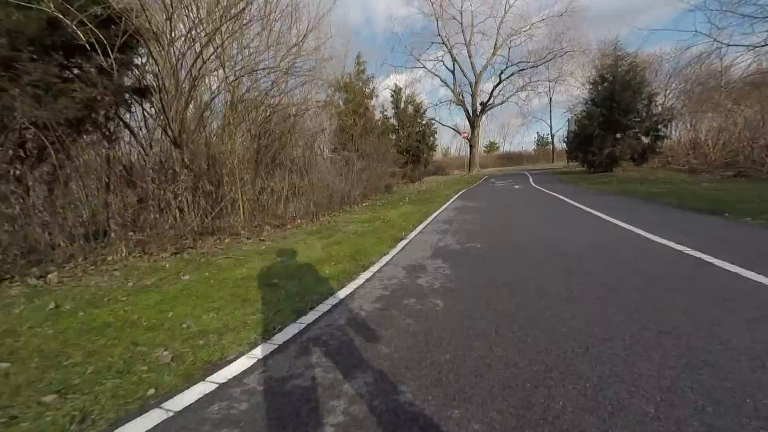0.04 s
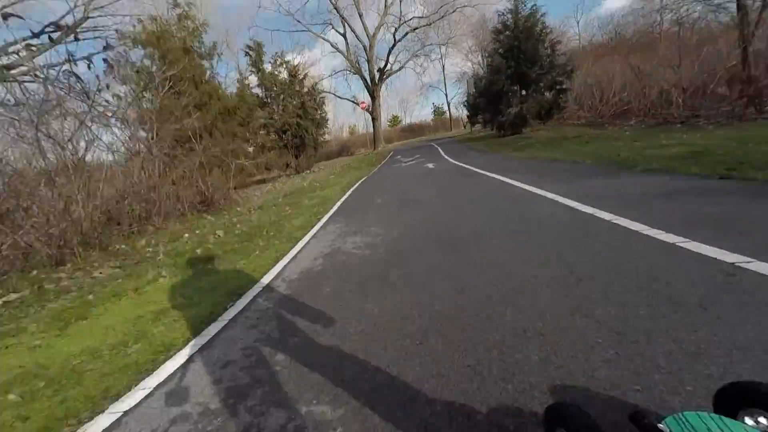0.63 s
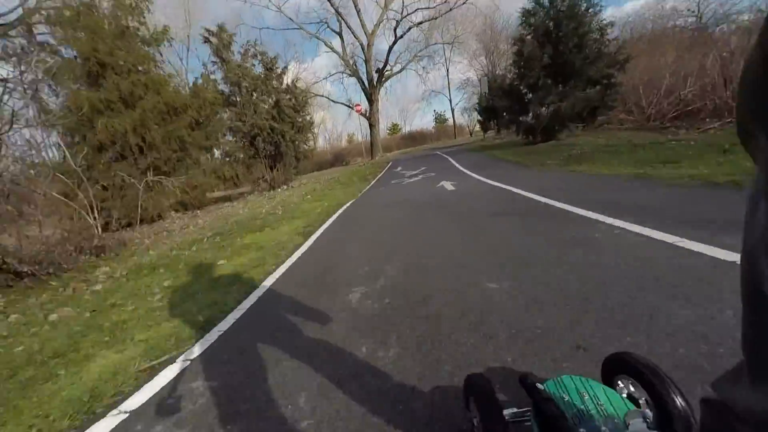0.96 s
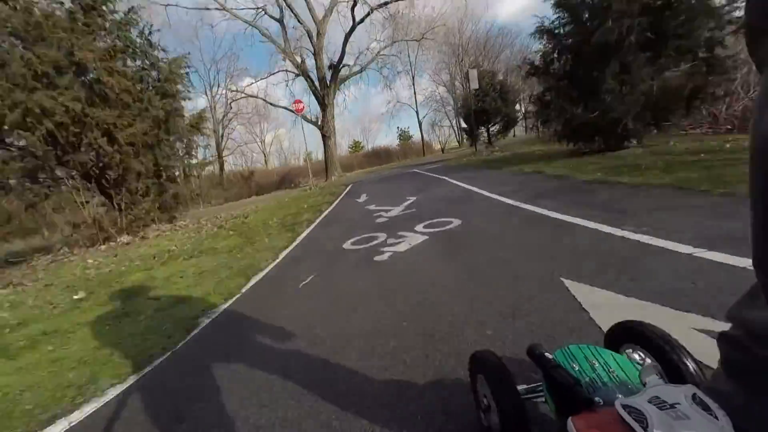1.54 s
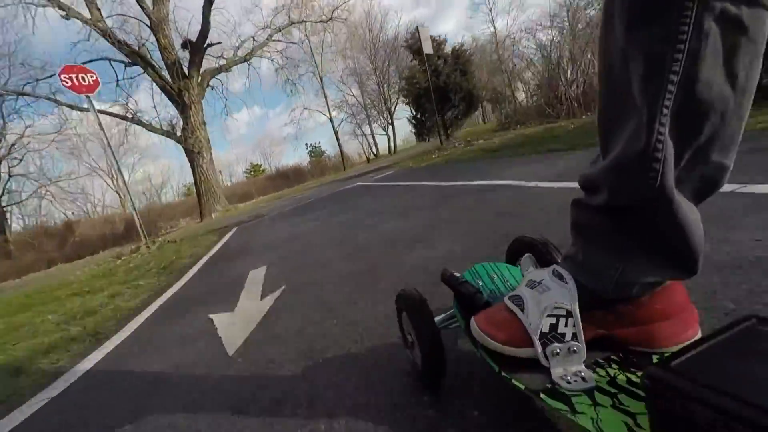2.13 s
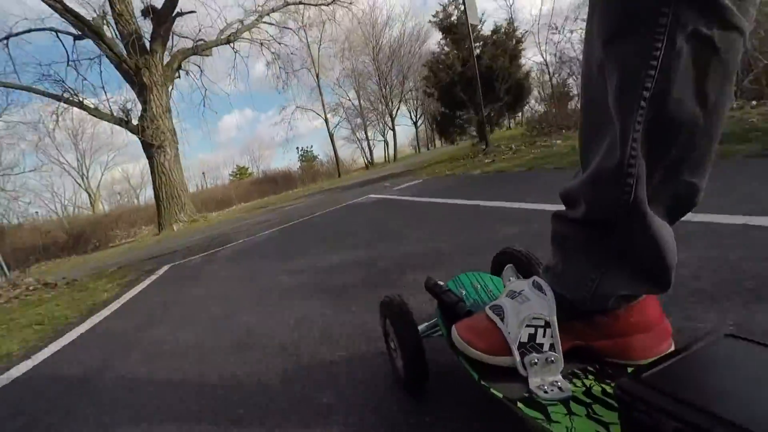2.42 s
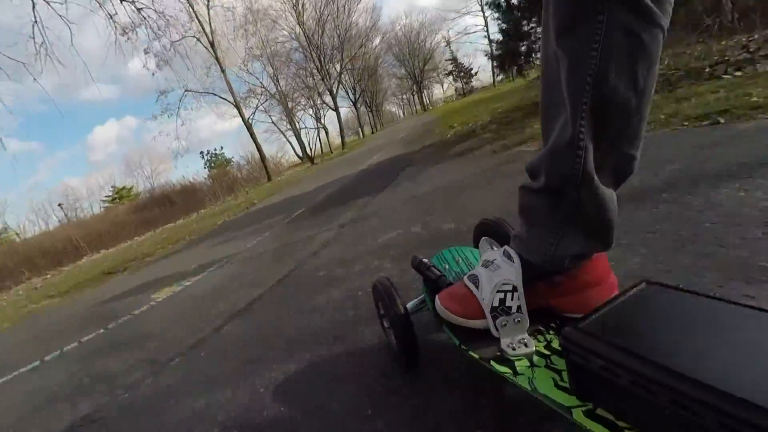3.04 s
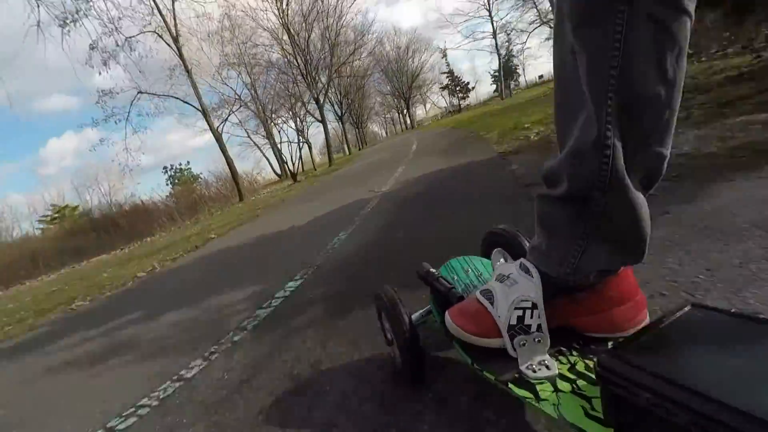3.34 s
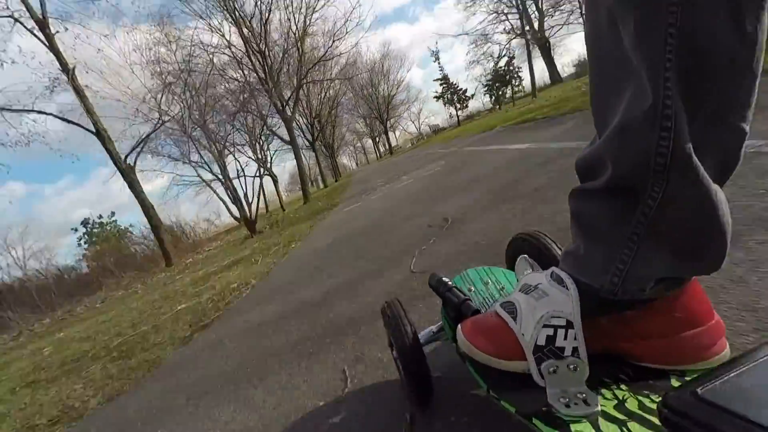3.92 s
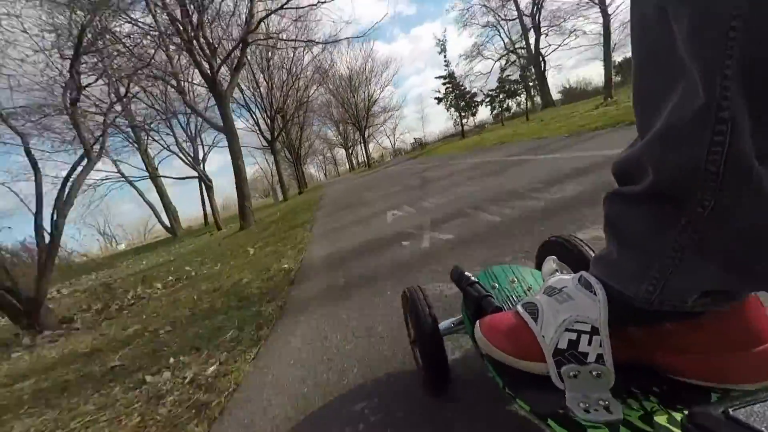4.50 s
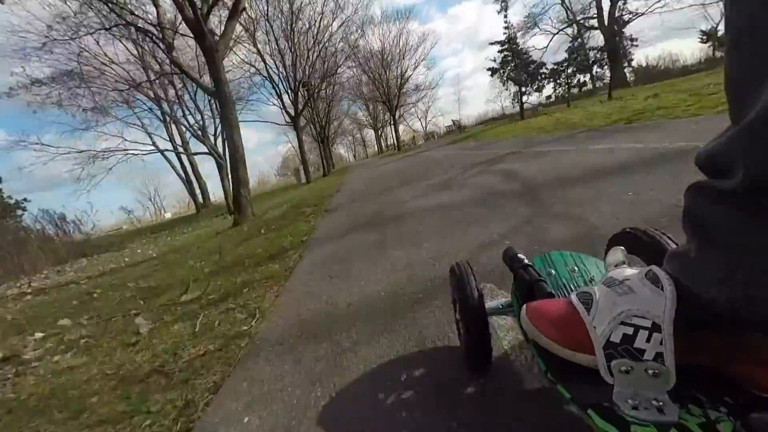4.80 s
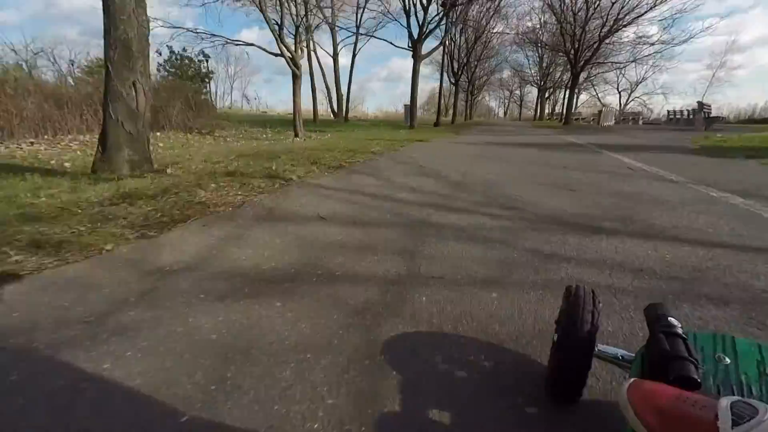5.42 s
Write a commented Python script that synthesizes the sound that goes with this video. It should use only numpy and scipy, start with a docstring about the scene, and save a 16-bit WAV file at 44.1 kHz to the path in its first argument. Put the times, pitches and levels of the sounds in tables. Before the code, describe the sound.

Wind buffets over tyre hiss as an electric board whines, coasts briefly, then drives on, with one sharp stone tick.

```python
"""An asphalt path, heard from just above the deck of a rolling electric mountain board.
The rider drives, coasts for about a second and drives on through a bend. Under power the switched
motor current whistles, the transmission's teeth rasp through the mounts and the shafts hum.
The tyres hiss and flick grit against the board, and wind buffets the microphone."""
import sys
import numpy as np
from scipy import signal
from scipy.fft import rfft, irfft, next_fast_len
from scipy.io import wavfile

SR = 44100
rng = np.random.default_rng(int(sys.argv[2]) if len(sys.argv) > 2 else 0)


def store_pcm(level_fs):
    """Save levels as 16-bit WAV."""
    pcm = np.round(np.clip(level_fs, -1, 1) * 32767).astype(np.int16)
    wavfile.write(sys.argv[1], SR, np.atleast_2d(pcm).T)


N = 245195
TIME = np.arange(N) / SR
SWITCHING_HZ, CRUISE_HZ = 7616, 110  # the controller's switching rate; electrical speed at a cruise


def amp(db):
    """Decibels to gain."""
    return 10 ** (np.asarray(db) / 20)


def unit(x):
    """Scales to rms 1."""
    return x / np.sqrt(np.mean(abs(x) ** 2) + 1e-20)


def curves(rows):
    """Automation lanes: each column of a time table, one value a sample."""
    times, *columns = np.transpose(rows)
    return [np.interp(TIME, times, column) for column in columns]


def swell(s, half_s):
    """A smooth bump of height 1 around the time s."""
    return np.exp(-((TIME - s) / half_s) ** 2)


def colour(x, points):
    """EQ along a (Hz, dB) outline, falling 60 dB an octave beyond its ends; rms 1."""
    hz, db = np.transpose(points)
    size = next_fast_len(N)
    octave, outline = np.log2(np.fft.rfftfreq(size, 1 / SR) + 1), np.log2(hz)
    beyond = abs(octave - np.clip(octave, outline.min(), outline.max()))
    gain = amp(np.interp(octave, outline, db) - 60 * beyond)
    return unit(irfft(rfft(x, size) * gain, size)[:N])


def drift(rate_hz):
    """A smooth, complex random modulator of rms 1, about rate_hz wide."""
    control_s = np.arange(2 ** 14) / 2500
    hz = np.fft.fftfreq(len(control_s), control_s[1])
    noise = rng.standard_normal((len(control_s), 2)) @ [1, 1j]
    smooth = np.fft.ifft(np.fft.fft(noise) / (1 + (hz / rate_hz) ** 2))
    return unit(np.interp(TIME, control_s, smooth))


def noise_band(hz, width_hz):
    """Narrow noise around one pitch."""
    return (drift(width_hz) * np.exp(2j * np.pi * hz * TIME)).real


def grains(per_s, spread_db):
    """Random tiny impacts, most small and a few large."""
    size = amp(spread_db * np.minimum(rng.exponential(1, N), 4))
    return unit(size * rng.choice([-1, 1], N) * (rng.random(N) < per_s / SR))


def wind():
    """Slow eddies thump the microphone; stronger gusts break up into quicker flutter."""
    # airflow, easing as the board slows and turns: (time [s], buffet level [dB])
    airflow = [(.1, -25), (1.7, -24), (2.2, -28.5), (3, -29.5), (3.35, -35.5), (3.8, -38), (4.55, -31.5),
               (5.55, -36)]
    # single gusts: (time [s], buffet boost [dB], flutter boost [dB])
    gusts = [(.17, 5, -3), (.57, 11, 3), (1.24, 4.5, 2.5), (1.46, 6, 3), (1.659, 10, 4.5), (2.02, 6.5, 2.5),
             (2.3, 6, 2.5), (2.5, 5.5, 1.5), (3.65, 7, 2.5), (4.41, 5, -5), (4.6, 4.5, -2.5),
             (4.92, 11.5, -2), (5.48, 4, 3)]
    # tone of each layer: (frequency [Hz], level [dB])
    buffet_eq = [(8, -17), (18, 0), (28, 0), (45, 0), (62, -4), (85, -40), (200, -34.5)]
    flutter_eq = [(35, -8), (58, 1.5), (80, 1.5), (120, -6.5), (170, -12), (250, -24.5), (400, -42),
                  (900, -39.5), (2000, -54)]
    gust_half_s = .0502
    air_db = curves(airflow)[0]
    buffet_db = air_db + sum(db * swell(s, gust_half_s) for s, db, _ in gusts)
    flutter_db = -26 + 1.792 * (air_db + 25)  # grows faster than the buffet
    flutter_db += sum(db * swell(s, gust_half_s) for s, _, db in gusts)
    buffet = amp(buffet_db) * colour(rng.standard_normal(N), buffet_eq)
    flutter = amp(flutter_db + 3.38 * drift(30.5).real) * colour(rng.standard_normal(N), flutter_eq)
    return buffet + flutter


def tyres():
    """The tread patters on asphalt; coarse patches swell the whole band and sand crackles."""
    # tone of the roar and of the top hiss: (frequency [Hz], level [dB])
    roar_eq = [(120, 2.5), (200, 3.5), (300, 2), (450, -4), (700, -12.5), (1080, -6), (1350, 4.5),
               (1950, -2), (2350, 1), (3100, 6), (3450, 3.5), (3950, 5.5), (4400, -6), (5400, -12.5)]
    hiss_eq = [(5000, -26), (5600, -11), (6700, -6.5), (7400, -20), (7900, -13), (8450, -10), (9300, -20),
               (10200, -10.5), (11500, -24), (12800, -15.5), (15300, -23.5)]
    # coarse or sandy stretches: (middle [s], half length [s], overall boost [dB], extra on hiss [dB])
    patches = [(.12, 0.11, 1.55, -7.5), (0.901, .1, 1.23, 2.5), (1.805, 0.082, 2.5, 0.5),
               (1.961, 0.0615, 0, 4.5), (5.132, 0.178, 2, -2.5), (5.472, 0.032, 2, -5)]
    coarse_db = sum(db * swell(s, half_s) for s, half_s, db, _ in patches)
    sandy_db = sum(db * swell(s, half_s) for s, half_s, _, db in patches)
    roar_db = -38 + coarse_db + 2.225 * drift(51.7).real
    hiss_db = roar_db - 12.94 + sandy_db
    patter = unit(rng.standard_normal(N) + .529 * grains(per_s=900, spread_db=1.58))
    roar = amp(roar_db) * colour(patter, roar_eq)
    hiss = amp(hiss_db + 2 * drift(28.5).real) * colour(patter, hiss_eq)
    t = np.arange(SR // 50) / SR
    burst = rng.standard_normal(len(t)) * np.exp(-t / .0037)
    crackle = signal.oaconvolve(grains(per_s=45, spread_db=3), burst)[:N]
    return roar + hiss + amp(hiss_db - 6) * colour(crackle, hiss_eq)


def grit():
    """Small stones strike the board; each tick rings for a few milliseconds."""
    # stone hits: (time [s], relative peak [dB], brightness centre [Hz])
    hits = [(.8272, -20.5, 3760), (1.5243, -20, 4600), (1.9774, -18, 3820), (2.216, -16.5, 3880),
            (2.4354, -18.5, 3210), (3.0964, -17, 3000), (3.2553, -18, 3000), (3.4879, 0, 3660),
            (3.9147, -15.5, 3820)]
    # the board's modes: (frequency [Hz], level [dB], t60 [s])
    modes = [(1400, -4, .005), (1760, -6, .005), (2300, -4, .003), (3050, 0, .0045), (3880, -3, .008),
             (5300, -24, .004), (6500, -20, .006), (8400, -16, .006), (10200, -14, .005)]
    t, out = np.arange(SR // 30) / SR, np.zeros(N)
    for s, db, centre_hz in hits:
        tick = np.zeros(len(t))
        for k, (hz, mode_db, t60) in enumerate(modes):
            contact_db = -8 * np.log2(hz / centre_hz) ** 2  # a harder contact favours higher modes
            decay = amp(mode_db + contact_db - 60 * t / t60)
            tick += (-1) ** k * decay * np.sin(2 * np.pi * hz * t)  # neighbours swing in opposition
        tick *= np.minimum(t / .0002, 1)
        slot = out[round(s * SR):][:len(t)]
        slot += (amp(db - 1.5) * tick / abs(tick).max())[:len(slot)]
    return out


def motor_tones(partials, turns):
    """Tones locked to the turning motor, each a steady core in a blurred skirt."""
    return unit(sum(amp(db) * ((.7 + drift(blur_hz)) * np.exp(2j * np.pi * order * turns)).real
                    for order, db, blur_hz in partials))


def shaft_hum(turns, load_db, excess_hz):
    """The shafts hum louder under load and at lower speed."""
    # shaft tones: (order [x electrical speed], level [dB], blur [Hz])
    shaft = [(3.25, -8.5, 7), (5, -17, 6), (6.5, -15, 24), (9.75, -11.5, 22), (13, 0, 36)]
    return amp(-41.5 + 1.063 * load_db - .18 * excess_hz) * motor_tones(shaft, turns)


def motor_fizz(ripple, load_db, excess_hz):
    """Bright noise pulsing with the torque ripple; a faster motor fizzes more."""
    # tone of the fizz: (frequency [Hz], level [dB])
    fizz_eq = [(4750, -19), (5280, 7), (5530, -12.5), (5850, 4), (6650, 8), (7000, 7), (7500, -14),
               (8100, -6.5), (8550, -0.5), (9200, -12), (10200, -3), (11400, -13), (12600, -5),
               (15300, -13)]
    level_db = -41 + .376 * load_db + .0219 * excess_hz
    return amp(level_db) * colour(rng.standard_normal(N) * ripple, fizz_eq)


def mounts(x):
    """Rings the motor mounts and truck: each mode is a band-pass applied twice."""
    # resonances: (frequency [Hz], nominal width [Hz], level [dB])
    modes = [(1400, 200, -14), (1790, 130, -18.5), (2400, 450, -19), (3110, 280, -12), (3650, 120, -7),
             (3840, 200, 0), (4010, 170, -1), (5300, 280, -24)]
    out = np.zeros(N)
    for k, (hz, width_hz, db) in enumerate(modes):
        b, a = signal.iirpeak(hz, hz / (1.3 * width_hz), fs=SR)
        out += (-1) ** k * amp(db) * signal.lfilter(b, a, signal.lfilter(b, a, x))
    return unit(out)


def transmission(outer_turns, inner_turns, ripple, load_db, excess_hz):
    """Teeth rattle the mounts: clear tones under load, blurring into a rasp at higher speed."""
    # tooth tones: (order [x electrical speed], level [dB], blur [Hz])
    teeth = [(13, -1, 20), (28, 0, 34), (29, -1, 40), (33, -5, 25), (35, 0, 28), (37, 0, 28)]
    scrape = unit(rng.standard_normal(N) + .174 * grains(per_s=1300, spread_db=1.93)) * ripple
    ring = mounts(motor_tones(teeth, inner_turns))
    bite = amp(-.5 + .25 * load_db - .1 * excess_hz)  # balance of ring to scrape
    rasp = amp(-31.5 + load_db) * (mounts(scrape) + bite * ring) / np.hypot(1, bite)
    # the outer wheel's teeth sing one tone of their own
    mesh = amp(-44 + .097 * load_db) * motor_tones([(28.15, 0, 22)], outer_turns)
    # a brief growl near the mounts' lowest resonance
    growl = amp(-40) * swell(.48, half_s=.01) * noise_band(1410, width_hz=77.5)
    return rasp + mesh + growl


def sidebands(turns, low7_db, low5_db, near_db, high7_db):
    """One motor's switched current sings either side of the switching rate, spaced by its speed."""
    # (order [x electrical speed], level [dB], roughness [0-1])
    tones = [(-7, low7_db, .4), (-5, low5_db + 1, .3), (-2, near_db - 2, .4),
             (2, near_db - 5, .4), (5, high7_db - 15, .6), (7, high7_db - 2, .75)]
    out = np.zeros(N)
    for order, db, roughness in tones:
        waver = 1 + .17 * drift(9) + roughness * drift(75)
        cycles = SWITCHING_HZ * TIME + order * turns
        out += amp(db) * np.sqrt(2) * (waver * np.exp(2j * np.pi * cycles)).real
    return out


def controller_whistle(outer_turns, inner_turns, strain_db, excess_hz):
    """The controller makes both motors whistle, the inner one more softly."""
    # the two main tones: (time [s], shared level [dB], lean from the -7 to the -5 sideband [dB])
    whistle = [(.15, -43.5, 5), (.45, -48, -12), (.72, -41, -27), (.93, -44, 19), (2.55, -52, -8.5),
               (2.92, -48.5, -21.5), (3.3, -52, 3), (3.65, -54, 4.5), (4.35, -53.5, 4.5),
               (4.65, -47.5, -7.5), (5, -37.5, -13), (5.35, -43.5, -18)]
    shared_db, lean_db = curves(whistle)
    low7_db = shared_db - 10 * np.log10(1 + amp(lean_db) ** 2)
    low5_db = low7_db + lean_db
    high7_db = -50.5 - .1524 * excess_hz  # the +7 sideband meets a housing resonance at a cruise
    outer = sidebands(outer_turns, low7_db, low5_db, strain_db, high7_db)
    inner = sidebands(inner_turns, low7_db - 14, low5_db - 14, strain_db - 12, high7_db - 6)
    return outer + inner


def drive():
    """Two motors and their transmission, following speed and load while the throttle is held."""
    # throttle held: (on [s], off [s])
    throttle = [(-1, 1.012), (2.31, 5.405)]
    # outer motor: (time [s], electrical speed [Hz])
    speed = [(.1, 136.3), (.65, 138), (1, 137.1), (2.55, 120.1), (2.8, 117.6), (3.6, 111), (4, 109.5),
             (5, 109.1), (5.4, 110.4)]
    # the inner motor lags in the bend: (time [s], speed [x outer motor])
    inner_ratio = [(0, 1.003), (2.4, .992), (3.3, .975), (4.1, .976), (4.5, .992), (4.95, .995),
                   (5.3, 1.013)]
    # load on the drive: (time [s], level against full load [dB])
    load = [(.1, -6), (.45, -5), (.75, -1), (1, -1.5), (2.4, -23.5), (2.65, -12.5), (3.6, -11),
            (4.25, -4.5), (4.75, -2), (4.92, 0.5), (5.12, -1.5), (5.3, -3.5), (5.4, -17.5)]
    rise_s, fall_s = .2, .025
    gate = sum(np.clip((TIME - on) / rise_s, 0, 1) * np.clip((off - TIME) / fall_s, 0, 1)
               for on, off in throttle)
    speed_hz, load_db = curves(speed) + curves(load)
    excess_hz = speed_hz - CRUISE_HZ
    strain_db = np.interp(TIME, (4.75, 5.05), (-62, -48.5))  # swells late in the second push
    # electrical cycles run so far; bumps in the path jog each wheel's speed
    outer_turns = np.cumsum(speed_hz + .7 * drift(10).real) / SR
    inner_turns = np.cumsum(speed_hz * curves(inner_ratio)[0] + .6 * drift(10).real) / SR
    ripple = 1 + .22 * np.cos(4 * np.pi * outer_turns)  # torque presses the teeth twice a cycle
    whistle = controller_whistle(outer_turns, inner_turns, strain_db, excess_hz)
    rasp = transmission(outer_turns, inner_turns, ripple, load_db, excess_hz)
    hum = shaft_hum(inner_turns, load_db, excess_hz)
    fizz = motor_fizz(ripple, load_db, excess_hz)
    winding_hiss = amp(strain_db + 5.5) * noise_band(SWITCHING_HZ, width_hz=330)
    return gate * (whistle + rasp + hum + fizz + winding_hiss)


def scene():
    """The whole mix sits dead centre."""
    mix = drive() + tyres() + wind() + grit()
    return np.array([mix, mix])


def record(dry):
    """Adds faint hiss in opposite polarity left and right, cuts in fast, rounds peaks, trims the top."""
    # (frequency [Hz], level [dB])
    hiss_eq = [(40, 5.5), (200, 11.5), (1000, -5.5), (3800, 12), (5000, 1), (7000, 6.5), (15000, -5)]
    start_s, ceiling, cutoff_hz = .0715, .92, 15350
    hiss = amp(-66.5) * colour(rng.standard_normal(N), hiss_eq)
    fade_in = np.clip((TIME - start_s) / .003, 0, 1)
    live = (dry + np.array([hiss, -hiss])) * fade_in
    rounded = live / (1 + (live / ceiling) ** 8) ** (1 / 8)
    low_pass = signal.firwin(511, cutoff_hz, window=("kaiser", 9), fs=SR)
    return signal.oaconvolve(rounded, low_pass[None], "same", axes=1)


dry = scene()
out = record(dry)
store_pcm(out)
```